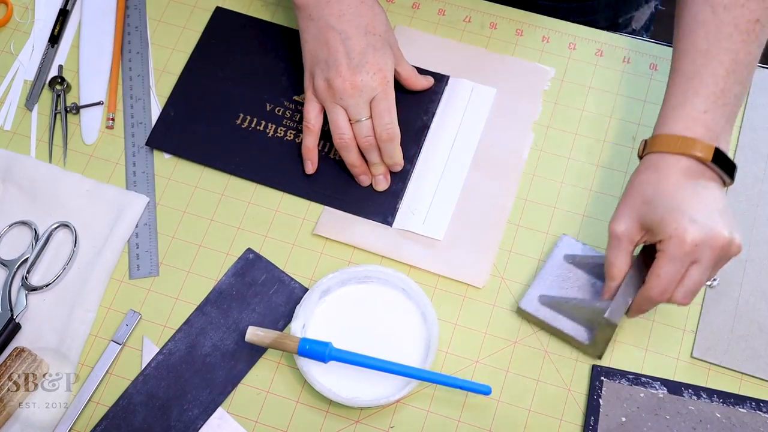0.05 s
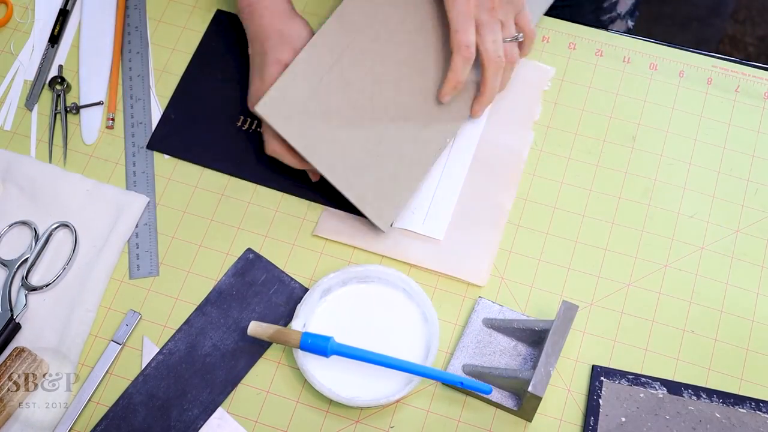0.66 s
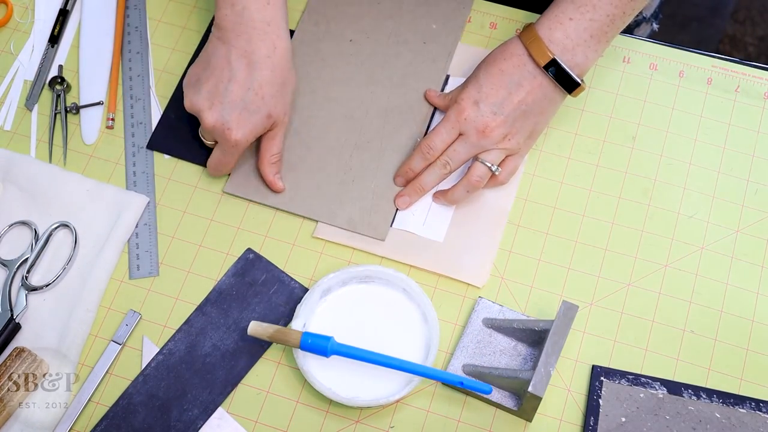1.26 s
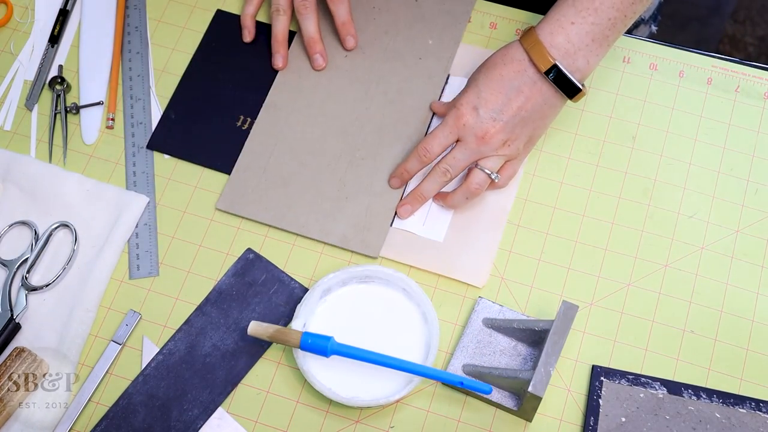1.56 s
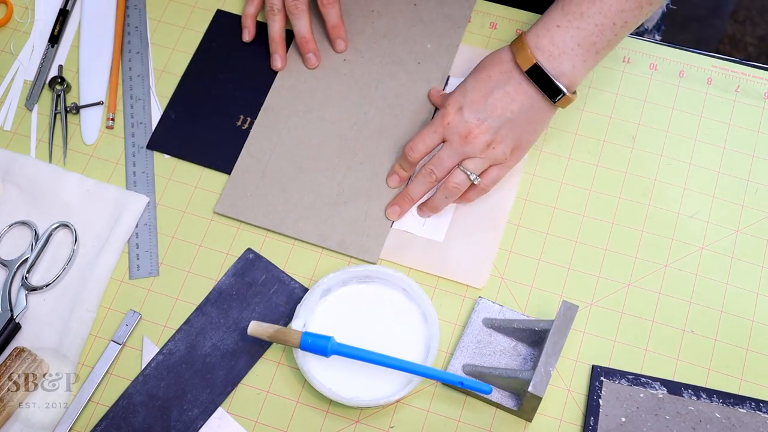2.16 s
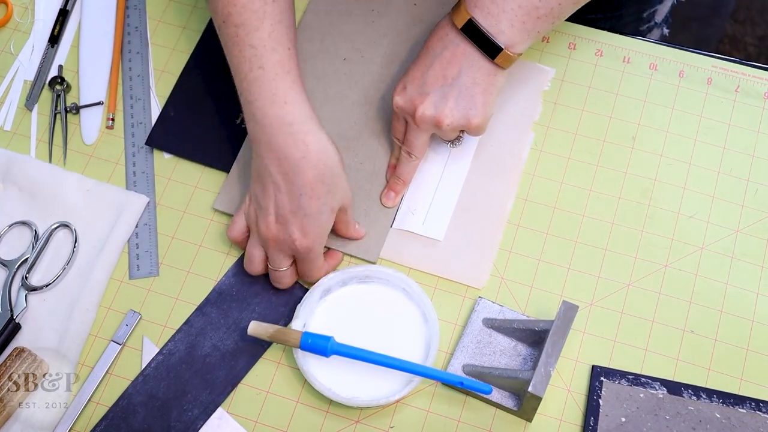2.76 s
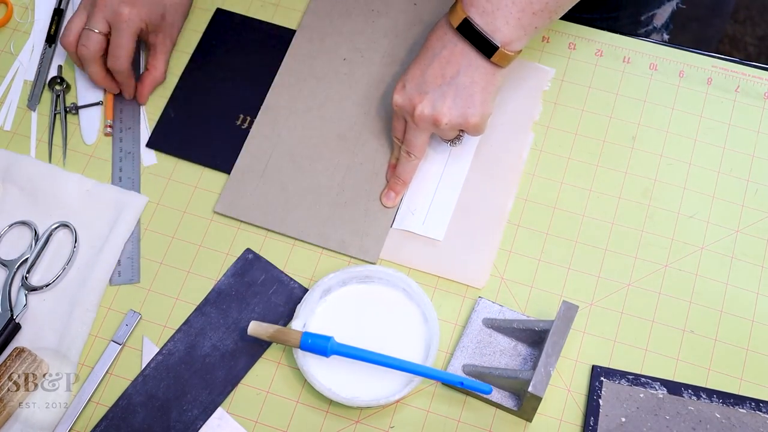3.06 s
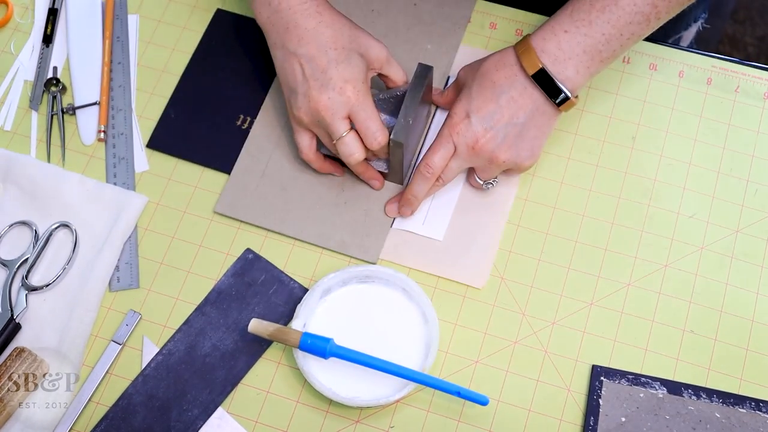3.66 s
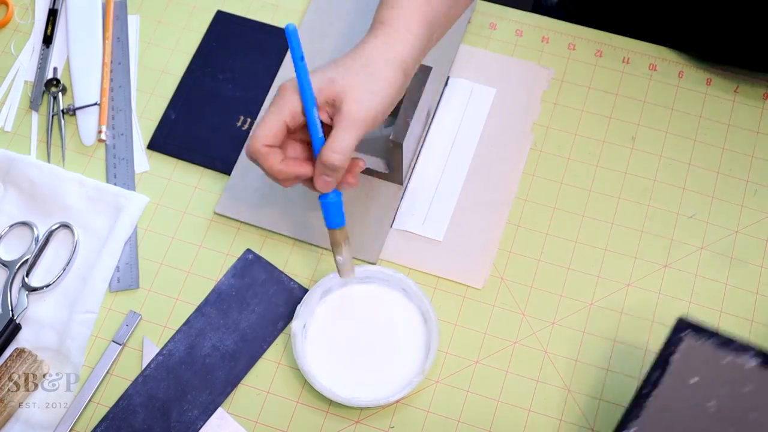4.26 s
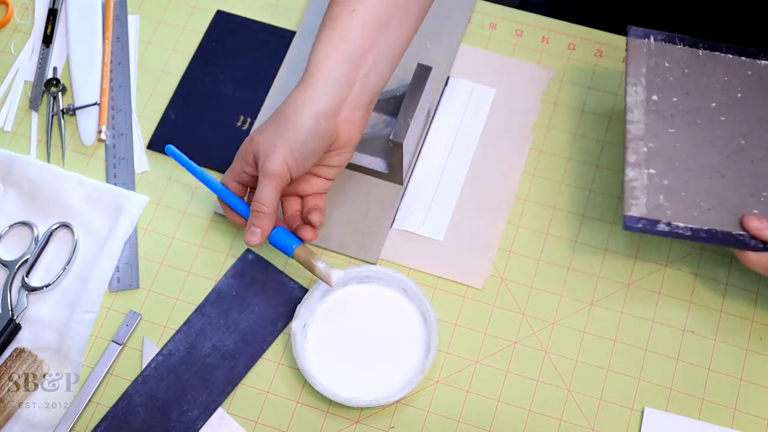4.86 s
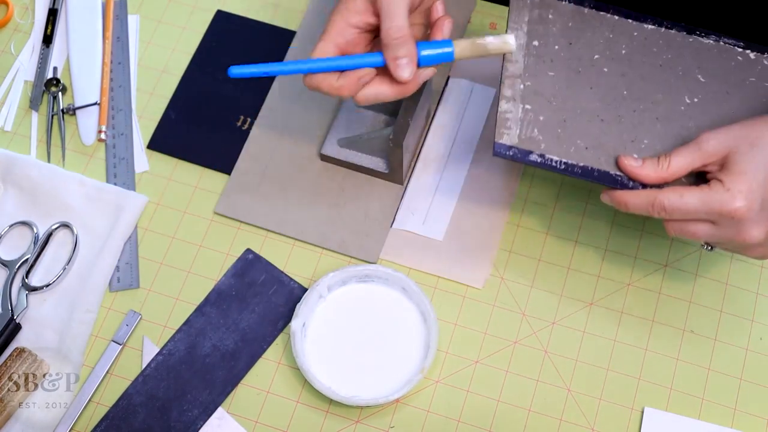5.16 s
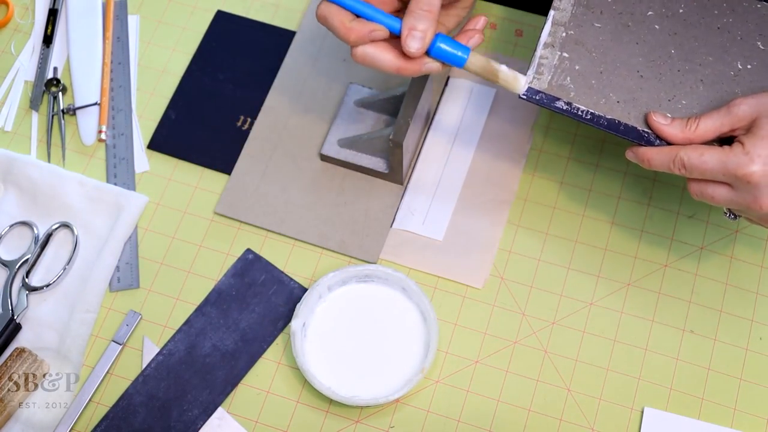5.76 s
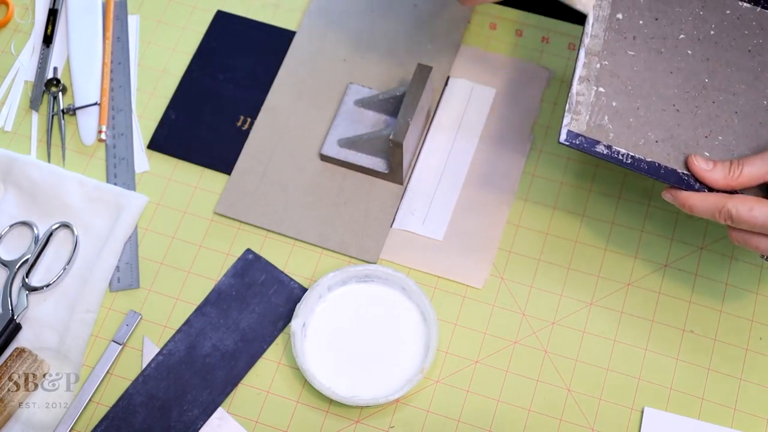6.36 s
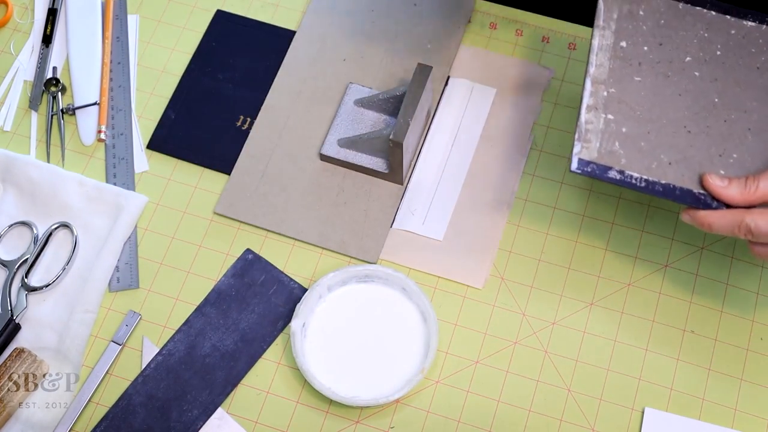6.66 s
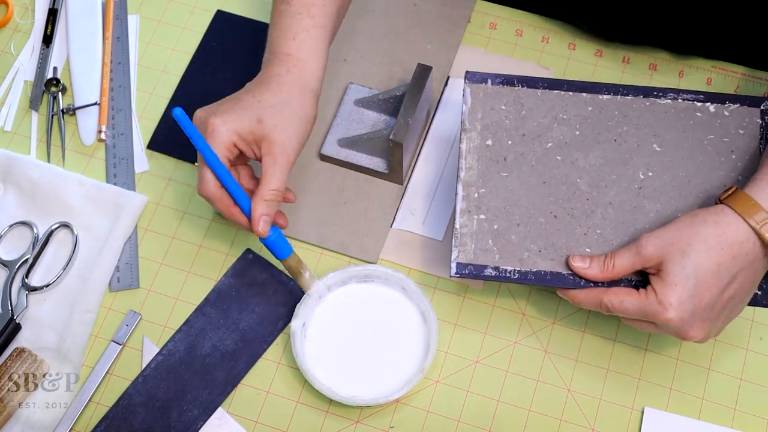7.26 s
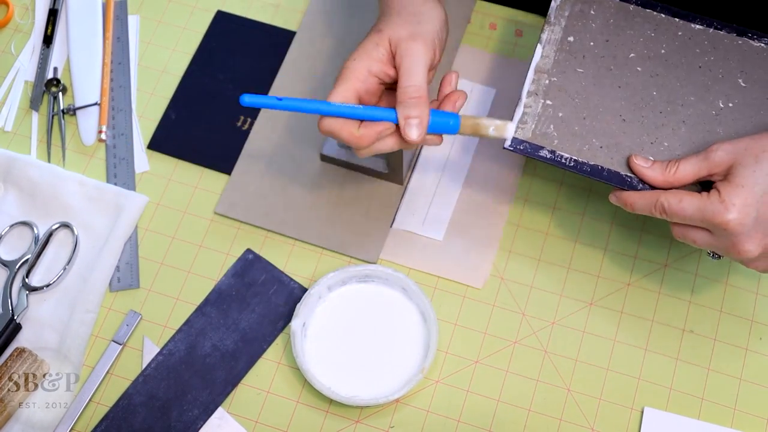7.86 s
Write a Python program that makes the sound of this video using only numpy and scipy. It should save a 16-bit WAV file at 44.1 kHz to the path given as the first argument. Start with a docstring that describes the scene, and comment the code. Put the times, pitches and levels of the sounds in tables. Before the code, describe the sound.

Card rustles, slides and snaps sharply on a work table, with a metal weight's clack and faint glue brush dabs.

```python
"""Card and paper on a bookbinder's table in a small, quiet workshop. A metal weight is set aside; a sheet
of card is laid down, slid and pressed until its edge snaps against the paper; the weight goes on top, then
a glue brush and a cover are picked up and the brush dabs the cover's edge. Table and walls scatter the
sound, so each contact is a short, diffuse noise burst over rustling hands and faint hiss, rumble and hum."""
import sys
import numpy as np
from scipy import signal
from scipy.fft import rfft, irfft, next_fast_len
from scipy.io import wavfile
from scipy.ndimage import uniform_filter1d

SR = 44100
rng = np.random.default_rng(int(sys.argv[2]) if len(sys.argv) > 2 else 0)


def digitize_waveform(pressure):
    """Quantize a signal to 16-bit integers and store it at the path in sys.argv[1].

    Rows of a 2-D input are taken as channels; values are limited to [-1, 1].
    """
    field = np.atleast_2d(pressure).T
    bounded = np.clip(field, -1, 1)
    quanta = np.round(bounded * 32767).astype(np.int16)
    wavfile.write(sys.argv[1], SR, quanta)


N = 357871
CUTOFF_HZ = 16050
# bright EQ of a card edge, snapped or dabbed: freq_hz, gain_db
CARD_EDGE_EQ = [(150, -44), (400, -51.5), (700, -50), (1100, -27), (1700, -17.5), (2700, -13.5), (4200, -8),
                (5600, -3.5), (7100, 2), (8500, -1.5), (11000, -3.5), (13500, -6), (16000, -18.5)]


def from_db(db):
    """Decibels to gain."""
    return 10 ** (np.asarray(db) / 20)


def unit_rms(x):
    """Scale to unit rms."""
    return x / np.sqrt(np.mean(x ** 2) + 1e-20)


def flutter(samples, grain_s):
    """Random movement of unit rms, smoothed over grain_s."""
    return unit_rms(uniform_filter1d(rng.standard_normal(samples), round(grain_s * SR)))


def gain_at(curve, hz):
    """Gain of a (freq_hz, gain_db) curve, straight on a log-frequency axis."""
    points_hz, db = np.transpose(curve)
    return from_db(np.interp(np.log(hz + 1e-9), np.log(points_hz), db))


def equalise(x, *curves):
    """Filter through (freq_hz, gain_db) curves; white noise keeps its power."""
    size = next_fast_len(x.shape[-1])
    hz = np.fft.rfftfreq(size, 1 / SR)
    gain = np.prod([gain_at(curve, hz) for curve in curves], axis=0) * (hz < CUTOFF_HZ)
    return irfft(rfft(x, size) * unit_rms(gain), size)[..., :x.shape[-1]]


def add(out, sound, start_s):
    """Mix a sound in from start_s on."""
    start = max(round(start_s * SR), 0)
    part = out[:, start:start + sound.shape[-1]]
    part += sound[..., :part.shape[-1]]


def ring(x, hz, t60_s):
    """A damped resonance with unity gain at its peak."""
    r = from_db(-60 / (t60_s * SR))
    feedback = [1, -2 * r * np.cos(2 * np.pi * hz / SR), r * r]
    return signal.lfilter(np.array([1, 0, -1]) * (1 - r * r) / 2, feedback, x + 1e-18)


def contacts(rows, eq, bass_hz, pivot_hz, treble_hz, peak_db, peak_octaves,
             squareness, lean, grain_db, grain_s, bounce):
    """Each contact is a cluster of tiny slips, scattered differently to left and right."""
    out = np.zeros((2, N))
    t = np.arange(-SR // 8, SR // 8) / SR
    hz = np.geomspace(100, CUTOFF_HZ, 300)
    for centre_s, level_db, length_s, bass_db, treble_db, resonance_hz in rows:
        half_s = length_s / 2 * (1 + lean * np.sign(t))  # the force comes on faster than it fades
        swell = np.exp(-np.abs(t / half_s) ** squareness)
        catches = from_db(grain_db * flutter(len(t), grain_s))  # fibres catch and let go
        slips = swell * catches * rng.standard_normal((2, len(t)))
        # the bounce off the table top arrives a moment later and ripples the spectrum
        bounce_delay = round(rng.uniform(.0008, .0026) * SR)
        slips = slips + bounce * np.roll(slips, bounce_delay, axis=1)
        # a firm push adds bass, a sharp edge treble; the spot touched sets the resonance
        tilt = [(bass_hz, bass_db), (pivot_hz, 0), (treble_hz, treble_db)]
        bell_db = peak_db / (1 + (np.log2(hz / resonance_hz) / peak_octaves) ** 2)
        burst = unit_rms(equalise(slips, eq, tilt, np.c_[hz, bell_db]))
        add(out, from_db(level_db) * burst * np.sqrt(np.mean(swell ** 2)), centre_s + t[0])
    return out


def room_tone(rumble_db, hum_hz, hum_db, hiss_db):
    """Building rumble and mains hum sit in the centre; the hiss is separate on each side."""
    # spectra of the rumble and the hiss: freq_hz, gain_db
    rumble_eq = [(15, -1), (27, 1.5), (36, -8), (48, 0.5), (62, -2), (76, -12.5), (120, -16.5), (190, -20),
                 (280, -27.5), (450, -48)]
    hiss_eq = [(120, -15.5), (290, -17.5), (430, -10), (640, -8.5), (900, -5.5), (1250, -6), (2400, -8),
               (3700, -6.5), (4300, -3), (8500, -2.5), (14500, -1), (16000, -4)]
    # faint resonances in the room's air noise: pitch_hz, t60_s, gain_db
    air_modes = [(639, .08, -1.5), (949, 0.11, 2), (1507, 0.069, 2), (1813, 0.0153, -1),
                 (3270, 0.0071, -7.5)]
    mid, side = equalise(rng.standard_normal((2, N)), rumble_eq)
    rumble = from_db(rumble_db) * (mid + from_db(-15) * side * [[1], [-1]])
    hum = from_db(hum_db) * np.sqrt(2) * np.sin(2 * np.pi * hum_hz * np.arange(N) / SR)
    hiss = from_db(hiss_db) * equalise(rng.standard_normal((2, N)), hiss_eq)
    air = from_db(hiss_db) * rng.standard_normal((2, N))
    return rumble + hum + hiss + sum(from_db(db) * ring(air, hz, t60_s) for hz, t60_s, db in air_modes)


def light_taps(length_s, bass_db):
    """Short, hard touches that ring near 3 kHz."""
    # taps: centre_s, level_db, treble_db, resonance_hz
    taps = [(.16, -33, 5, 3400), (0.176, -35, 6, 4200), (.573, -39.5, -2, 2980), (0.582, -43.5, 10, 2900),
            (3.225, -39, 3, 2800), (4.244, -37.5, 21, 2200), (4.451, -50, 9, 2800),
            (4.467, -46.5, -12, 2600), (7.244, -53, 13, 3380)]
    # tone of a tap: freq_hz, gain_db
    tap_eq = [(150, -26), (400, -33), (800, -19), (1400, -9), (2100, -6), (2600, 4), (3000, 3),
              (3600, -2.5), (4500, -12.5), (7000, -10), (10000, -21), (16000, -25)]
    rows = [(s, db, length_s, bass_db, treble_db, hz) for s, db, treble_db, hz in taps]
    return contacts(rows, tap_eq, bass_hz=700, pivot_hz=2900, treble_hz=8340,
                    peak_db=6.5, peak_octaves=0.15,
                    squareness=1.5, lean=0.1, grain_db=3, grain_s=0.0009, bounce=0.17)


def friction_slides(pivot_hz, treble_db, treble_db_per_octave):
    """The metal weight scrapes and settles, then card, paper and hands slide in smooth swells."""
    # strokes, the first four the weight's: centre_s, level_db, length_s, bass_db, resonance_hz
    slides = [(.2, -43.5, 0.027, 0, 2600), (0.242, -47, 0.018, 12, 5000), (0.318, -35.5, .026, 10.5, 7200),
              (0.354, -44.5, 0.031, 5, 3240), (0.718, -41.5, 0.033, 11, 6460),
              (0.762, -50.5, 0.085, 11, 6000), (0.952, -49.5, 0.089, 2, 9500),
              (1.105, -48, 0.051, -2, 5530), (1.501, -38, 0.028, -1, 9800), (1.529, -40.5, 0.039, -2, 7350),
              (1.579, -52.5, .03, 10, 7550), (2.422, -38, 0.043, 4, 7800), (2.577, -52, 0.052, 3, 2170),
              (3.003, -44.5, 0.056, 8.5, 2820), (3.063, -43.5, 0.044, 11, 2400),
              (3.227, -40.5, 0.02, 3, 9200), (3.896, -56, 0.047, 9, 3800), (4.077, -36, 0.029, 0.5, 2320),
              (4.118, -40.5, 0.042, 16, 4000), (4.152, -37.5, 0.045, 13.5, 4950),
              (4.209, -33, 0.039, 11.5, 5800), (4.313, -48, .046, -12, 4830),
              (4.369, -48.5, 0.057, 1, 7500), (4.436, -46, .017, -4, 4000), (4.508, -49.5, 0.018, 6, 4400),
              (4.534, -45, 0.018, -24, 4940), (4.649, -54.5, 0.072, -15, 5130), (4.7, -42, 0.024, -3, 6000),
              (4.751, -36.5, 0.033, -17, 6200), (4.771, -31.5, 0.021, -28, 5560),
              (4.91, -44.5, 0.035, -2, 2780), (7.727, -49.5, .032, -4, 14000), (7.841, -58, .045, 6, 14000)]
    # tone of the friction: freq_hz, gain_db
    slide_eq = [(150, -31.5), (350, -38), (600, -26), (850, -16.5), (1200, -15), (2000, -8.5), (3000, -4.5),
                (4200, -3.5), (5500, -1.5), (7500, -0.5), (10500, -6.5), (16000, -13.5)]
    # a lighter, finer contact rings higher and hisses more
    rows = [(s, db, length_s, bass_db, treble_db + treble_db_per_octave * np.log2(hz / pivot_hz), hz)
            for s, db, length_s, bass_db, hz in slides]
    return contacts(rows, slide_eq, bass_hz=1120, pivot_hz=pivot_hz, treble_hz=13030,
                    peak_db=9.5, peak_octaves=0.56,
                    squareness=1.77, lean=0.084, grain_db=1.2, grain_s=0.004, bounce=0.28)


def metal_weight(clack_gain_db, ring_gain_db):
    """The weight lands with a clack, damped by the mat, and rings briefly with the table top."""
    # landings: centre_s, relative_level_db, length_s, bass_db, treble_db, resonance_hz
    landings = [(0.227, -28.5, 0.0059, 0.5, 1.5, 1750), (3.292, -41, 0.0065, 2, -5, 2660)]
    # tone of the clack: freq_hz, gain_db
    clack_eq = [(150, -22), (450, -30), (600, -22), (800, 4), (1000, -8.5), (1400, -2), (2500, -8.5),
                (4600, -1.5), (7500, -4), (10000, -11), (16000, -33)]
    # modes of the weight and table top: pitch_hz, relative_gain_db, t60_s
    modes = [(734, -2, .05), (900, -2, 0.052), (1200, -2, 0.062), (1500, -17, 0.069), (1953, -4, 0.029),
             (2730, -10, 0.045), (4700, -20, 0.033)]
    clack = contacts(landings, clack_eq, bass_hz=400, pivot_hz=1510, treble_hz=8000,
                     peak_db=6.5, peak_octaves=0.35,
                     squareness=1, lean=0.026, grain_db=1, grain_s=0.00023, bounce=0.32)
    ringing = sum(from_db(db) * ring(clack, hz, t60_s) for hz, db, t60_s in modes)
    return from_db(clack_gain_db) * clack + from_db(ring_gain_db) * ringing


def table_thuds(t60_cycles):
    """The table top thuds under a load: low modes, dead centre, gone within a few cycles."""
    # thuds: start_s, level_db, pitch_hz
    thuds = [(.228, -45, 35.4), (0.57, -53.5, 208), (0.756, -62, 149), (2.455, -45, 260), (4.715, -52, 45)]
    out = np.zeros((2, N))
    t = np.arange(SR // 2) / SR
    for start_s, db, hz in thuds:
        decay = from_db(-60 * hz * t / t60_cycles)
        add(out, from_db(db) * np.sin(2 * np.pi * hz * t) * decay, start_s)
    return out


def hand_rustle(idle_db, fade_s, patch_db, patch_s):
    """Hands and sleeves brush the work: light friction that comes and goes in small patches."""
    # spells of movement: start_s, end_s, level_db
    spells = [(0.575, 0.987, -57), (1.0, 1.5, -63.5), (2.55, 3.467, -61.5), (4.017, 4.847, -59.5),
              (6.3, 7.9, -68)]
    t = np.arange(N) / SR
    level_db = np.full(N, float(idle_db))
    for start_s, end_s, db in spells:
        level_db[(t >= start_s) & (t < end_s)] = db
    level_db = uniform_filter1d(level_db, round(fade_s * SR))
    patches = unit_rms(from_db(patch_db * flutter(N, patch_s)))
    friction_eq = [(450, -19), (1000, -7), (2500, -6), (7000, 1.5), (15000, -6.5)]
    return from_db(level_db) * patches * equalise(rng.standard_normal((2, N)), friction_eq)


def card_snaps(zing_hz, zing_t60_s, zing_db):
    """Stiff edges of card and paper let go with a bright crack and a short zing."""
    # snaps: centre_s, level_db, bass_db, treble_db, resonance_hz
    snaps = [(.642, -46, -9, -1, 5600), (0.846, -44.5, 3, 10, 6550), (.94, -43.5, 12, -3, 9000),
             (1.267, -46.5, 12, 10, 4570), (1.324, -44.5, -2, -2, 6400), (1.465, -42.5, 3, 6, 5400),
             (1.486, -35, 2, -4, 5470), (1.82, -42, -4, -3, 9400), (1.9804, -18.5, -4, 0.5, 6000),
             (1.9937, -12.5, 12.5, 9.5, 4970), (2.012, -20.5, -6, 3.5, 2500), (2.0343, -17.5, 4, -6, 3300),
             (2.041, -30, 2, 15, 3400), (2.073, -43, -14, 3, 2920), (2.126, -51, 3, -1, 4400),
             (2.267, -35, 10, -6, 6740), (2.4406, -14.5, -7, -8, 8600), (2.447, -19, -5, 0, 3400),
             (2.4577, -8.5, 19, 10, 6800), (2.4817, -11, -1, -1, 2500), (2.539, -41.5, 9, -14, 2200),
             (2.549, -26, -10, -3.5, 2420), (2.656, -34.5, 12, 13, 6100), (2.746, -24.5, -29, 7, 6800),
             (2.778, -49, 10, 2, 7900), (2.845, -51.5, 20, -6, 2500), (2.861, -24.5, 8.5, -10, 9900),
             (4.368, -39.5, -13, -3, 8000), (4.718, -34, 7, -12, 5800)]
    hard_s, hard_db, db_per_doubling = 0.0077, -2.5, 74  # gentler snaps let go more slowly
    rows = [(s, db, hard_s * 2 ** ((hard_db - db) / db_per_doubling), bass_db, treble_db, hz)
            for s, db, bass_db, treble_db, hz in snaps]
    cracks = contacts(rows, CARD_EDGE_EQ, bass_hz=1190, pivot_hz=6230, treble_hz=14000,
                      peak_db=8.5, peak_octaves=0.33,
                      squareness=2, lean=0.05, grain_db=1.5, grain_s=0.0029, bounce=0.31)
    return cracks + from_db(zing_db) * ring(cracks, zing_hz, zing_t60_s)


def table_knocks(length_s, pivot_hz, treble_db, treble_db_per_octave):
    """Card, hands and brush bump the table and glue dish; a spot that rings higher sounds brighter."""
    # knocks: centre_s, level_db, bass_db, resonance_hz
    knocks = [(0.754, -37.5, 0, 1190), (2.622, -46.5, -4, 1980), (2.701, -38.5, -13, 2780),
              (2.723, -33.5, 1.5, 2880), (3.953, -44.5, -8, 2150), (4.542, -55, 13, 600),
              (4.584, -44.5, 10.5, 1360), (4.596, -60, 19, 550), (4.623, -59, 19, 600),
              (4.713, -41, 7, 554), (4.72, -44, 3, 2000)]
    # dull tone of a knock: freq_hz, gain_db
    knock_eq = [(150, -18), (310, -18), (480, -12.5), (750, -5.5), (1000, -4), (1300, -3), (2000, 1.5),
                (2700, -7), (4500, -2), (7000, -8), (10000, -10), (16000, -28)]
    rows = []
    for s, db, bass_db, hz in knocks:
        octaves_up = max(np.log2(hz / pivot_hz), 0)
        rows.append((s, db, length_s, bass_db, treble_db + treble_db_per_octave * octaves_up, hz))
    return contacts(rows, knock_eq, bass_hz=482, pivot_hz=pivot_hz, treble_hz=5950,
                    peak_db=11.5, peak_octaves=0.39,
                    squareness=1.02, lean=0.024, grain_db=4, grain_s=0.00059, bounce=0.99)


def glue_brush(length_s, bass_db, treble_db, resonance_hz):
    """Wet bristles touch the cover's edge and peel off with a soft, sticky tick."""
    # dabs: centre_s, level_db
    dabs = [(5.267, -56), (5.422, -55), (6.388, -55), (6.447, -59.5), (6.549, -61), (6.84, -57),
            (6.93, -57.5), (7.502, -56.5)]
    rows = [(s, db, length_s, bass_db, treble_db, resonance_hz) for s, db in dabs]
    return contacts(rows, CARD_EDGE_EQ, bass_hz=1200, pivot_hz=6000, treble_hz=14100,
                    peak_db=14.5, peak_octaves=0.45,
                    squareness=2.3, lean=0.1, grain_db=2.5, grain_s=0.001, bounce=0.45)


def reflections(x, t60_s, treble_t60_s, predelay_s, eq):
    """Dense echoes, unrelated on the two sides, with a separate decay time above 8 kHz."""
    t = np.arange(SR // 2) / SR
    noise = rng.standard_normal((2, len(t)))
    dull = signal.sosfilt(signal.butter(2, 8000, fs=SR, output="sos"), noise)
    bright = signal.sosfilt(signal.butter(2, 8000, "high", fs=SR, output="sos"), noise[::-1])
    tail = dull * from_db(-60 * t / t60_s) + bright * from_db(-60 * t / treble_t60_s)
    fade_in = np.clip(t / predelay_s - 1, 0, 1)
    impulse = unit_rms(equalise(tail * fade_in, eq)) / np.sqrt(len(t))
    return signal.fftconvolve(x, impulse, axes=1)[:, :N]


def scene():
    """Mix the handling with the table's close echoes, the room's faint tail, thuds and room tone."""
    snaps = card_snaps(zing_hz=7080, zing_t60_s=0.015, zing_db=-9.5)
    weight = metal_weight(clack_gain_db=3.5, ring_gain_db=5.5)
    knocks = table_knocks(length_s=0.007, pivot_hz=1350, treble_db=-7.5, treble_db_per_octave=15)
    taps = light_taps(length_s=0.0092, bass_db=5.5)
    slides = friction_slides(pivot_hz=4870, treble_db=2.5, treble_db_per_octave=1.5)
    brush = glue_brush(length_s=0.027, bass_db=8.5, treble_db=10.5, resonance_hz=4320)
    rustle = hand_rustle(idle_db=-68.5, fade_s=0.063, patch_db=4, patch_s=0.021)
    handling = taps + slides + weight + rustle + snaps + knocks + brush
    table_echoes = reflections(handling, t60_s=0.062, treble_t60_s=0.061, predelay_s=0.003,
                               eq=[(300, -7), (2500, -1.5), (7000, -4), (15000, -6.5)])
    room_tail = reflections(handling, t60_s=0.13, treble_t60_s=0.233, predelay_s=0.0093,
                            eq=[(300, 4), (2500, 9.5), (7000, 3), (15000, -7.5)])
    thuds = table_thuds(t60_cycles=2.8)
    bed = room_tone(rumble_db=-70.5, hum_hz=57.1, hum_db=-79, hiss_db=-60.5)
    return handling + from_db(-14) * table_echoes + from_db(-31) * room_tail + thuds + bed


def record(dry):
    """A steep low-pass takes off the very top."""
    return signal.sosfilt(signal.ellip(12, .1, 80, CUTOFF_HZ, fs=SR, output="sos"), dry)


dry = scene()
out = record(dry)
digitize_waveform(out)
```